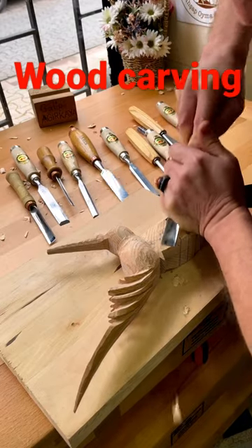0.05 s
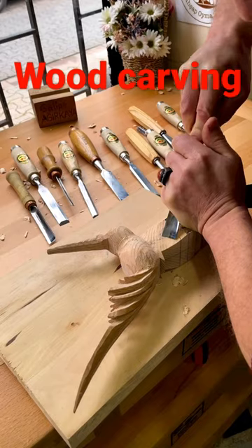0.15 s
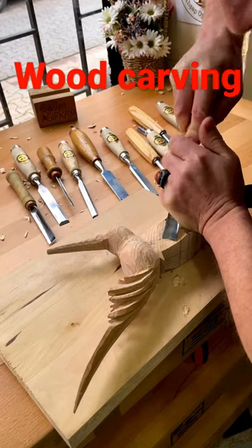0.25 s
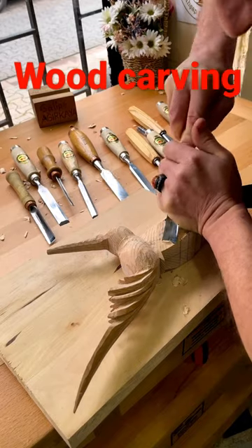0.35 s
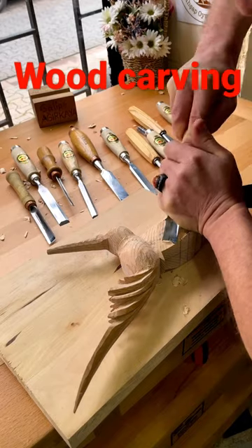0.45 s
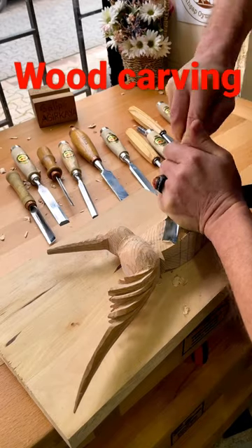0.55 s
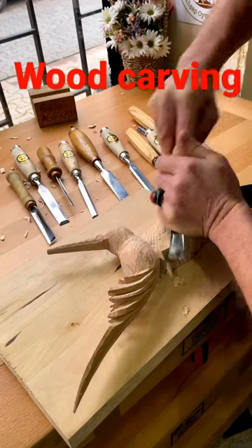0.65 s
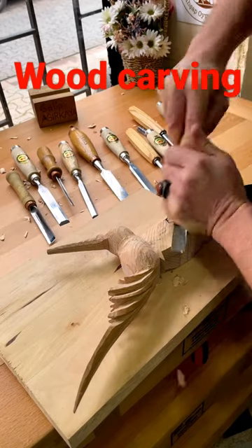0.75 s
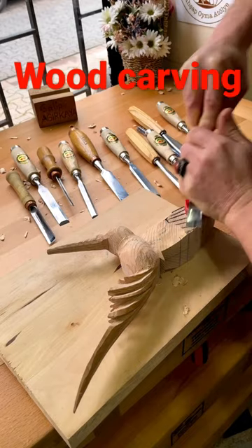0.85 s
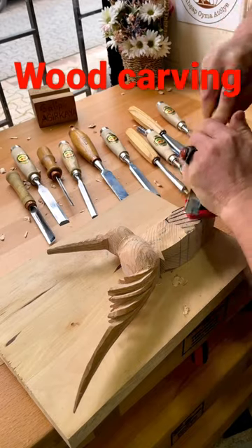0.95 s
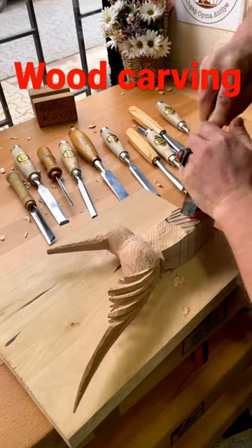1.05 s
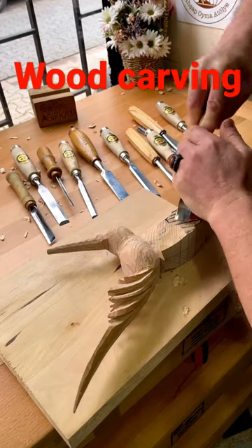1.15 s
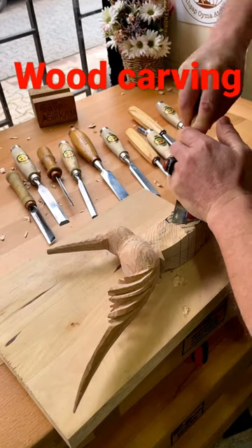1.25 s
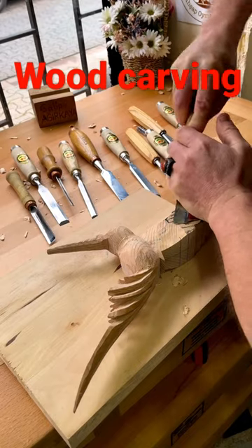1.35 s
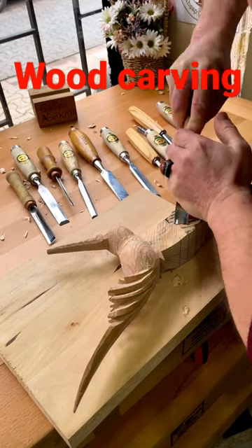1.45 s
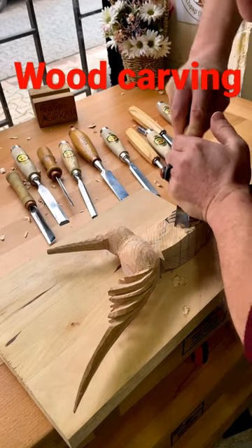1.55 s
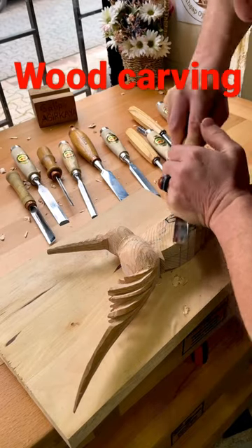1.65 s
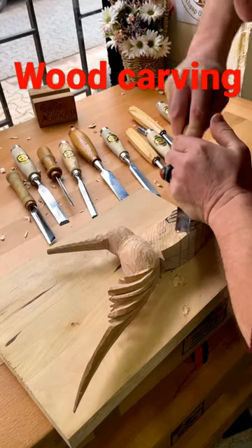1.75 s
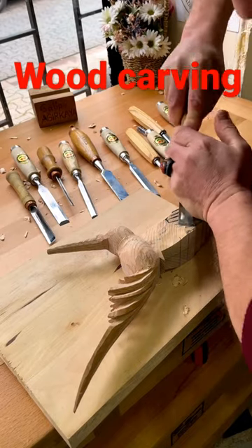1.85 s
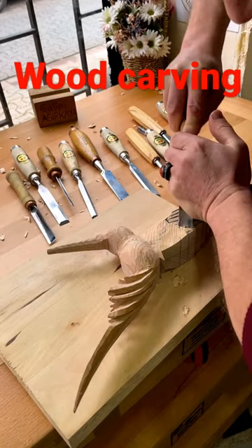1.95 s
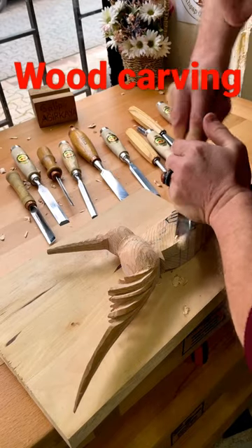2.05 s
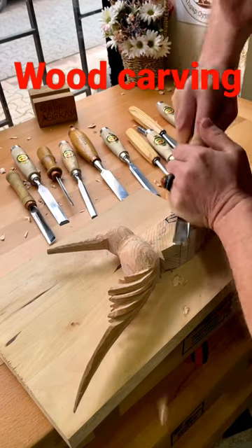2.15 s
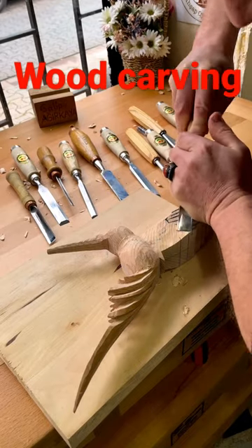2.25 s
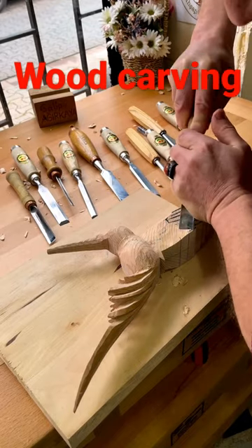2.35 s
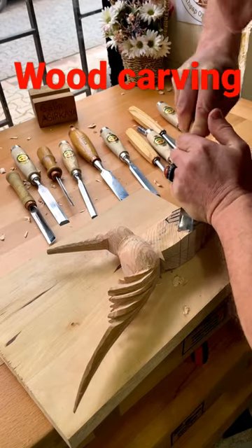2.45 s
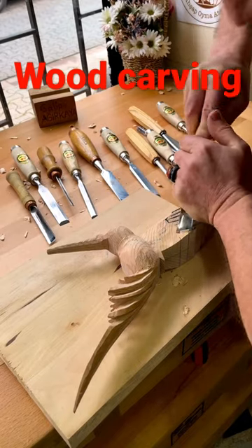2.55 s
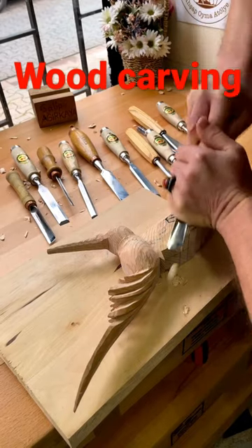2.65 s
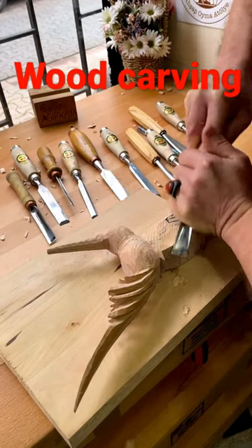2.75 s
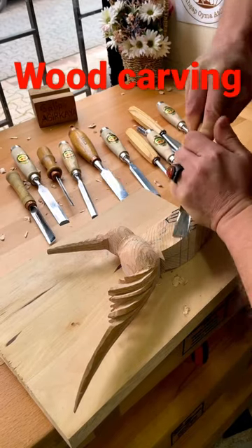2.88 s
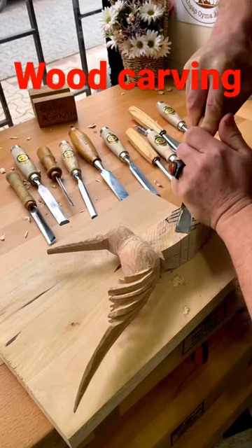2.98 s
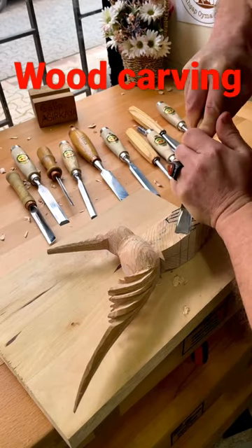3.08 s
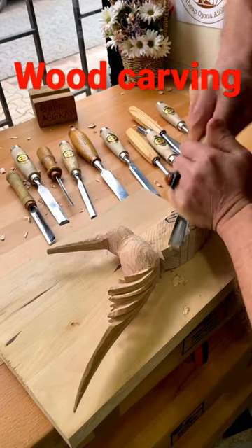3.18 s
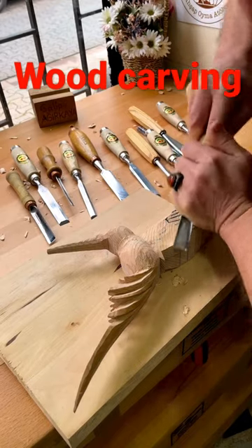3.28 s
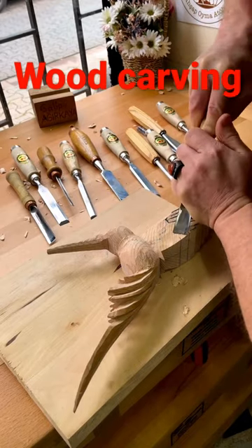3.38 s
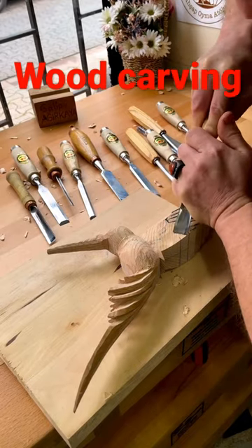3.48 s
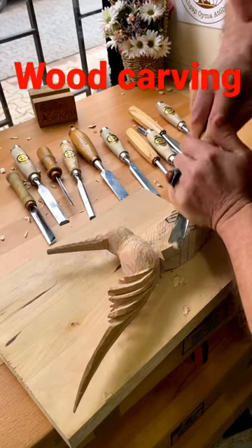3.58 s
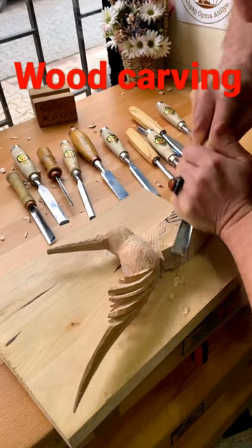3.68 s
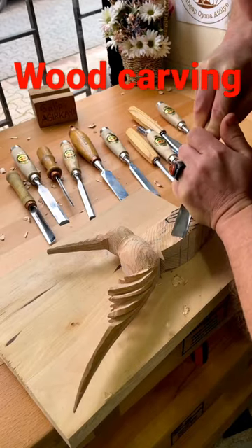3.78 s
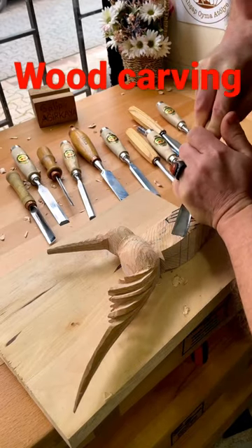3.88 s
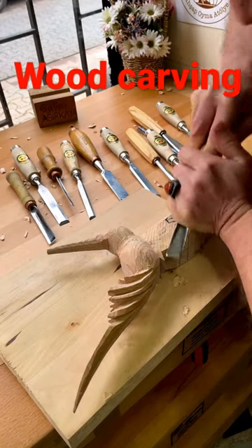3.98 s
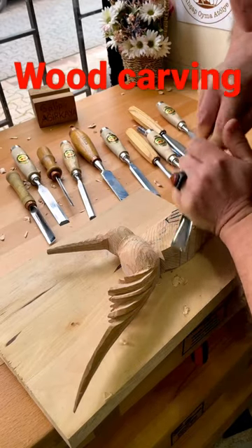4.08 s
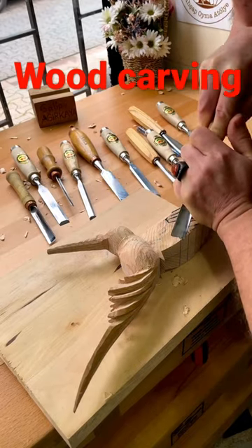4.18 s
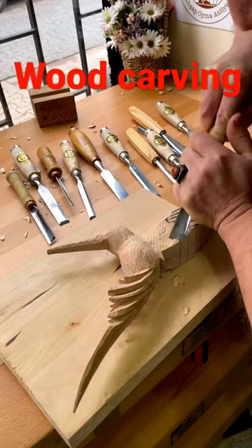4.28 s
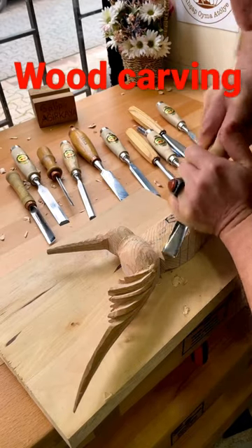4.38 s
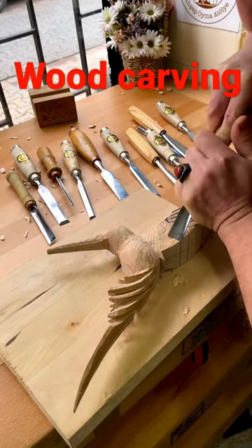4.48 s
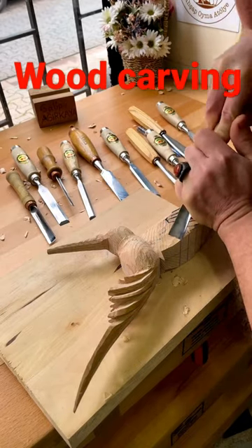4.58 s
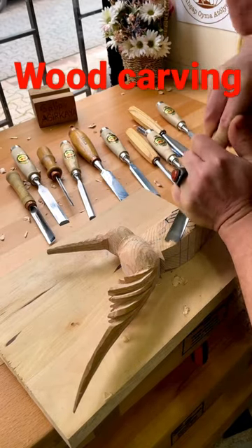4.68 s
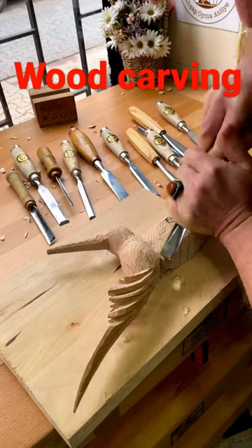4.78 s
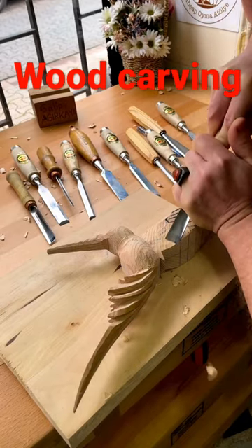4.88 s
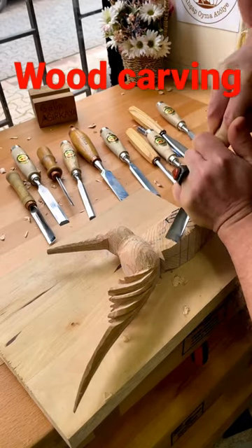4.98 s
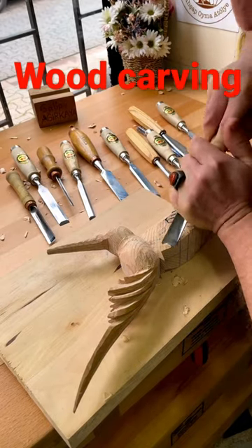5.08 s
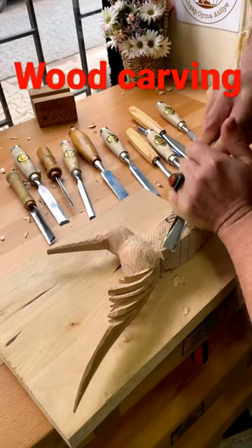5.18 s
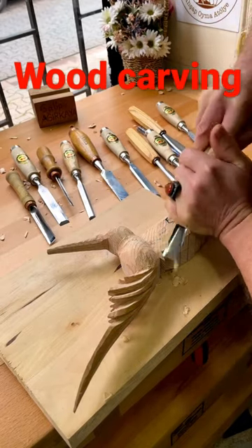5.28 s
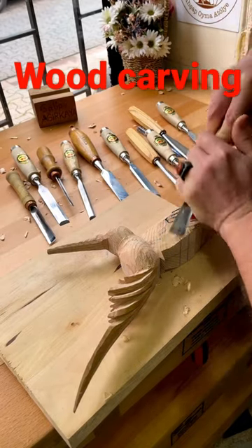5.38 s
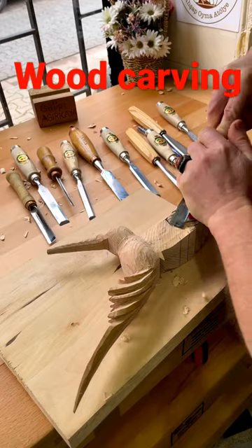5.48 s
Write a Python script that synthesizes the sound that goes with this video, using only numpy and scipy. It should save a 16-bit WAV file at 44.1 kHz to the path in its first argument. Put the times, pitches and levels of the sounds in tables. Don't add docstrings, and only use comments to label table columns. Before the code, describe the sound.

Close, dry wood-carving: separate rasping chisel pushes, the bench creaking underneath, tiny chip ticks, and a quiet low room hum.

```python
import sys
import numpy as np
from scipy import signal
from scipy.fft import rfft, irfft, next_fast_len
from scipy.io import wavfile
from scipy.ndimage import uniform_filter1d

SR = 44100
rng = np.random.default_rng(int(sys.argv[2]) if len(sys.argv) > 2 else 0)


def transcribe(u):
    v = np.clip(np.atleast_2d(u).T, -1, 1)
    q = np.round(v * 32767).astype(np.int16)
    wavfile.write(sys.argv[1], SR, q)


def linear_from_db(decibels):
    return 10 ** (np.asarray(decibels, float) / 20)


N = 243873

# (f/Hz, t60/s, level/dB)
BOARD_MODES = [(556, 0.033, -9), (686.7, 0.18, -3), (755, 0.13, -25), (821, 0.53, -12.5),
               (853.6, 0.14, 0.5), (928, 0.068, 0.5), (1053, 0.068, -12), (1210, 0.095, -2),
               (1470, 0.076, -6), (1560, 0.17, -10), (1647, 0.054, -9.5), (1774, 0.022, -13.5),
               (2012, 0.067, -7.5), (2215, 0.029, -10.5), (2474, 0.011, -8.5), (2930, 0.064, -7.5)]
# (f/Hz, level/dB in each Hz)
RASP_SPECTRUM = [(300, -2.5), (700, 11.5), (1500, -4.5), (2500, -1), (4000, -2.5), (6000, -11.5),
                 (9000, -11.5), (12500, -18), (14000, -45)]
# (t/s of the peak, level/dB, rise/s, fall/s, rasp share/dB)
CUTS = [(0.0, -48, .05, 0.032, -4.5), (0.305, -41.5, 0.094, 0.053, -10.5), (0.634, -31, 0.027, 0.008, -9.5),
        (1.578, -32, 0.059, 0.023, -10), (2.051, -29, 0.059, 0.034, -10), (2.483, -41.5, 0.1, 0.09, -10.5),
        (2.633, -25.5, 0.0036, 0.033, -9), (3.184, -28.5, 0.06, 0.017, -10),
        (3.588, -30.5, 0.06, 0.042, -11), (3.959, -42.5, 0.055, 0.06, -8),
        (4.327, -28.5, 0.055, 0.038, -13.5), (4.702, -30.5, 0.056, 0.071, -10.5),
        (5.069, -39.5, 0.052, 0.017, -8), (5.191, -28.5, 0.014, 0.032, -14.5),
        (5.31, -54.5, 0.13, 0.047, -7)]
# (t/s, level/dB)
NICKS = [(0.176, -62), (0.6, -60), (0.978, -58), (1.086, -79), (1.69, -73), (1.736, -70), (1.809, -48.5),
         (1.885, -52), (1.921, -48), (1.958, -38.5), (2.298, -50.5), (2.39, -52.5), (3.083, -46.5),
         (3.91, -51), (4.104, -54.5), (4.14, -59.5), (4.968, -78), (5.51, -61)]
# (t/s, level/dB)
RUB = [(0, -50), (.22, -69.5), (.45, -72.5), (.7, -59), (.96, -77.5), (1.2, -61.5), (1.5, -58),
       (2.0, -68.5), (2.36, -77), (2.9, -58), (3.049, -71), (3.46, -60.5), (3.88, -79), (4.22, -69),
       (4.62, -91), (4.85, -75), (5.0, -88), (5.53, -74)]


def chisel():
    nick_rise_s, nick_fall_s, nick_rasp_db = 0.0067, 0.016, -15
    nicks = [(s, db, nick_rise_s, nick_fall_s, nick_rasp_db) for s, db in NICKS]

    lag_s, drag_db, follow, drag_fall_s, drag_rasp_db = 0.074, -55.5, 0.67, 0.21, -7
    usual_db = CUTS[2][1]
    drags = [(s + lag_s, drag_db + follow * (db - usual_db), lag_s, drag_fall_s, drag_rasp_db)
             for s, db, *_ in CUTS]
    cut, rasp = efforts(CUTS + nicks + drags, RUB, rest_share_db=-5.5, rounding=1.446)

    tear = snaps(3000, spread_db=1.5) * linear_from_db(1.8 * walk(120))
    unit = np.sqrt(np.mean(ring(tear, BOARD_MODES) ** 2))
    board = ring(tear * cut * linear_from_db(-0.5), BOARD_MODES) / unit

    fibres = colour(snaps(5000, spread_db=3.0) * linear_from_db(1.6 * walk(300)), RASP_SPECTRUM)
    edges_hz = 300 * 2 ** np.arange(0, 5.6, 0.25)
    edge = 0
    for pair in zip(edges_hz, edges_hz[1:]):
        band = signal.sosfilt(signal.butter(2, pair, "band", fs=SR, output="sos"), fibres)
        edge = edge + band * linear_from_db(2.6 * walk(70))
    return board + level(edge, 6.68) * rasp


# (f/Hz, t60/s, level/dB)
BENCH_MODES = [(228.7, 0.21, 2), (258, 0.23, -4.5), (283.7, 0.17, -5.5), (341.1, 0.13, 1), (434, 0.24, -7),
               (479, 0.094, -12), (600.7, 0.049, -7.5), (764, .06, -13.5), (776, 0.053, -15.5),
               (966, 0.079, -19.5)]
# (f/Hz, t60/s, level/dB)
LEG_MODES = [(137.6, 0.043, -5), (168.9, 0.18, -2.5), (182, 0.052, -6.5)]
# (t/s of the peak, level/dB, rise/s, fall/s, share of the leg modes/dB)
SHOVES = [(0.0, -40.5, .05, .2, 8.5), (0.295, -33, 0.038, 0.056, -7.5), (0.36, -50.5, 0.053, .08, 16),
          (0.617, -29, 0.021, 0.11, -3), (0.685, -39, 0.064, 0.079, 4), (0.755, -42, 0.084, 0.099, 4.5),
          (1.576, -28, 0.048, 0.042, -0.5), (1.87, -47.5, .15, 0.28, -26), (2.074, -30, 0.13, 0.074, -4.5),
          (2.496, -30.5, 0.079, 0.04, -2.5), (2.636, -23.5, .008, 0.066, -4.5),
          (2.751, -24, .04, 0.035, -4.5), (2.805, -37, 0.044, .06, 7), (2.945, -29, 0.13, 0.077, -2),
          (3.0, -36.5, 0.059, 0.034, 8), (3.175, -24, 0.059, 0.1, -8.5), (3.59, -29.5, .11, 0.068, -12),
          (4.325, -26, 0.073, 0.1, -20), (4.488, -46.5, 0.08, 0.054, -1), (4.68, -24, 0.03, 0.15, -13.5),
          (4.735, -25, 0.064, 0.073, -8), (5.085, -26.5, 0.069, 0.042, -14), (5.198, -23, 0.024, 0.043, -9),
          (5.296, -45.5, 0.17, 0.075, -1.5)]
# (t/s, level/dB)
LEAN = [(0, -45), (.45, -56), (.57, -51.5), (.83, -51), (1.13, -61), (1.4, -61), (1.7, -51.5), (2.289, -51),
        (2.37, -60.5), (2.87, -45), (3.36, -45.5), (3.7, -48.5), (3.87, -66), (3.98, -52), (4.17, -51),
        (4.24, -70), (4.87, -49.5), (5.53, -68)]


def bench():
    push, deep = efforts(SHOVES, LEAN, rest_share_db=4.5, rounding=1.16)
    groan = 0
    for modes, force in ((BENCH_MODES, push * linear_from_db(-3.5)), (LEG_MODES, deep * linear_from_db(-4.0))):
        lumps = snaps(1500, spread_db=1.2) * linear_from_db(1.5 * walk(40))
        unit = np.sqrt(np.mean(ring(lumps, modes) ** 2))
        groan = groan + ring(lumps * force, modes) / unit
    return groan


# (t/s, peak level/dB, board ring level/dB, brightness level/dB, chip tone f/Hz)
KNOCKS = [(0.178, -64, -30, -21, 740), (0.6, -51.5, -11, -6, 850), (0.6299, -45.5, -13, -3.5, 960),
          (0.9724, -66, -30, -15, 780), (1.1491, -39, -37, -44, 1562), (1.82, -43, -26, -33, 1510),
          (1.8936, -55.5, -11, -30, 1470), (2.2105, -52.5, -22.5, -11, 755), (2.6298, -35, -20, -13.5, 794),
          (2.7424, -45, -35, -20, 860), (2.9474, -65, -12, -32, 813), (3.3453, -54, -24, -6, 1210),
          (3.5736, -43.5, -14, -5, 920), (3.9075, -54, -19.5, -15, 1210), (3.954, -40, -22, -12.5, 1950),
          (4.2464, -65, -31, -26, 759), (4.6732, -55, -26, -28.5, 1210), (4.9654, -67, -25, -24, 805),
          (5.183, -31, -16.5, -4, 1210), (5.3083, -47.5, -33, -36, 940), (5.4113, -64, -30, -5, 912),
          (5.4898, -44, -22.5, -34, 810)]
# (f/Hz, level/dB)
CRACK_SPECTRUM = [(400, -9), (900, 4), (1550, -17.5), (2500, 3), (4000, 5), (6000, -9.5), (9000, -40),
                  (13000, -8)]


def knocks():
    t = np.arange(int(0.04 * SR)) / SR
    crack, top, tone, board, thud = np.zeros((5, N + len(t)))
    bursts = rng.standard_normal((len(KNOCKS), len(t))) * np.exp(-t / 0.0026)
    for (s, db, ring_db, bright_db, hz), burst in zip(KNOCKS, bursts):
        at = slice(int(s * SR), int(s * SR) + len(t))
        crack[at] += linear_from_db(db) * burst
        top[at] += linear_from_db(db + bright_db) * burst * np.exp(-t / 0.0012)
        tone[at] += linear_from_db(db - 2) * np.sin(2 * np.pi * hz * t) * np.exp(-t / 0.005)
        board[at] += linear_from_db(db + ring_db) * burst
        thud[at] += linear_from_db(db - 16.5 + 0.41 * bright_db) * np.exp(-t / 0.0004)
    ticks = linear_from_db(5) * colour(crack, CRACK_SPECTRUM) + tone[:N]

    sizzle = signal.sosfilt(signal.butter(2, 6500, "high", fs=SR, output="sos"), top[:N])
    body = linear_from_db(18.5) * sizzle
    body = body + linear_from_db(30.0) * ring(board[:N], BOARD_MODES)
    body = body + linear_from_db(23.5) * ring(thud[:N], BENCH_MODES + LEG_MODES)
    return ticks, body


# (t/s, level/dB)
SLIDE = [
    (1.16, -73),
    (1.18, -60.5),
    (1.312, -70),
    (1.352, -66),
    (1.524, -60),
    (1.56, -64),
]


def slide():
    s, db = np.transpose(SLIDE)
    band = signal.butter(3, (3200, 5400), "band", fs=SR, output="sos")
    hiss = signal.sosfilt(band, rng.standard_normal(N))
    return level(hiss, 0) * linear_from_db(np.interp(np.arange(N) / SR, s, db, left=-120, right=-120))


# (f/Hz, level/dB)
AIR_SPECTRUM = [(15, -33.5), (25, -6), (70, -4.5), (351, -11), (644, -16), (796, -10), (1040, -37),
                (2120, -33), (2480, -58.5), (4200, -31), (5770, -44.5), (12400, -44), (13800, -75)]
# (f/Hz, width/Hz, level/dB)
HUM = [(58.1, 4.6, -53), (100.16, 3.4, -58)]
# (f/Hz, start t/s, end t/s, level/dB)
WHINE = [
    (3135, 2.2, 3.6, -73),
    (4710, 2.4, 2.9, -68),
    (4750, 5.4, 4.8, -83),
]


def shop():
    t = np.arange(N) / SR
    air = level(colour(rng.standard_normal(N), AIR_SPECTRUM), -55) * linear_from_db(0.94 * walk(5.21))
    for hz, width, db in HUM:
        b, a = signal.iirpeak(hz, hz / width, fs=SR)
        air = air + level(signal.lfilter(b, a, rng.standard_normal(N)), db) * linear_from_db(0.5 * walk(1.5))
    for hz, start, end, db in WHINE:
        b, a = signal.iirpeak(hz, 60, fs=SR)
        whine = level(signal.lfilter(b, a, rng.standard_normal(N)), db)
        gate = uniform_filter1d(1. * (t > start) * (t < end), size=3000)
        air = air + whine * gate * linear_from_db(3.3 * walk(45))
    return air


# (f/Hz, phase/rad)
PORT_LEAD = [(0, 0), (250, 0), (550, -2.3), (800, -2.4), (1500, -.1), (2100, .5), (2650, 3), (3600, 6.6),
             (4800, 6.8), (5500, 9.4), (6300, 9.5), (7200, 12.4), (8500, 12.6), (9700, 15.7), (10800, 15.8),
             (12000, 18.8), (14000, 19)]
# (f/Hz, level/dB)
PORT_SHADE = [(60, 0), (110, 2.5), (200, 5), (340, 11), (480, 6), (1200, 4.5), (2200, .5), (4000, -2.5),
              (5300, 0), (13400, -1)]
# (f/Hz, level/dB)
SCATTER = [(60, -14.5), (250, -12.5), (600, -1), (1500, -2.5), (2500, -5.5), (3000, 6.5), (4800, 4.5),
           (5500, -5), (6300, -1.5), (7000, -2.5), (8200, 0.5), (11200, -4), (12300, -14)]


def ports(x):
    room_t60_s, onset_s = 0.2, 0.00078
    size = 2 * next_fast_len(N // 2 + SR // 4)
    hz = np.arange(size // 2 + 1) * SR / size
    turn = np.exp(0.5j * np.interp(hz, *np.transpose(PORT_LEAD)))
    shade = linear_from_db(across(PORT_SHADE, hz) / 2)

    t = np.arange(int(0.4 * SR)) / SR
    decay = np.exp(-np.log(1000) * t / room_t60_s) * np.minimum(t / onset_s, 1)
    tails = rng.standard_normal((2, len(t))) * decay
    tails = tails / np.sqrt(np.sum(tails ** 2, axis=1, keepdims=True))
    tails = rfft(tails, size) * linear_from_db(across(SCATTER, hz))

    paths = np.array([turn + tails[0], 1 / turn + tails[1]])
    paths = paths / np.sqrt(uniform_filter1d(np.abs(paths) ** 2, size=500, axis=1))
    return irfft(rfft(x, size) * paths * np.array([shade, 1 / shade]), size)[:, :N]


def efforts(rows, rest, rest_share_db, rounding):
    t = np.arange(0, N + 16, 16) / SR
    whole = linear_from_db(np.interp(t, *np.transpose(rest))) ** 2
    share = whole * linear_from_db(rest_share_db) ** 2
    for s, db, rise, fall, share_db in rows:
        away = np.abs(t - s) / np.where(t < s, rise, fall)
        swell = linear_from_db(db - 20 * np.minimum(away, 10) ** rounding) ** 2
        whole = whole + swell
        share = share + swell * linear_from_db(share_db) ** 2
    return [np.interp(np.arange(N) / SR, t, np.sqrt(power)) for power in (whole, share)]


def snaps(rate, spread_db):
    when, size, sign = rng.random(N), rng.exponential(size=N), rng.standard_normal(N)
    return level((when < rate / SR) * sign * linear_from_db(spread_db * size), 0)


def ring(x, modes):
    out = 0
    for k, (hz, t60, db) in enumerate(modes):
        r = np.exp(-np.log(1000) / (t60 * SR))
        w = 2 * np.pi * hz / SR
        mode = signal.lfilter([0, np.sin(w)], [1, -2 * r * np.cos(w), r * r], x)
        out = out + (-1) ** k * linear_from_db(db) * np.sqrt(1 - r) * mode
    return out


def colour(x, points):
    hz, db = np.transpose(points)
    grid_hz = np.arange(2049) * SR / 4096
    cep = irfft(np.interp(np.log(grid_hz + 1), np.log(hz), db) * np.log(10) / 20)
    cep[1:2048] *= 2
    cep[2049:] = 0
    return signal.fftconvolve(x, irfft(np.exp(rfft(cep))))[:N]


def walk(rate):
    k = int(SR / rate)
    held = np.repeat(rng.standard_normal(size=4096)[:N // k + 1], k)
    return 1.06 * uniform_filter1d(uniform_filter1d(held, k), k)[:N]


def level(x, db):
    return x * linear_from_db(db) / np.sqrt(np.mean(x ** 2))


def across(points, hz):
    return np.interp(np.log(hz + 1), np.log(np.array(points)[:, 0]), np.array(points)[:, 1])


def scene():
    ticks, body = knocks()
    blade = chisel()
    null_band = signal.butter(2, (2450, 3200), "band", fs=SR, output="sos")
    ticks = ticks + linear_from_db(-9) * signal.sosfilt(null_band, blade)
    work = ports(blade + bench() + body + linear_from_db(-0.5) * ticks + shop() + slide())
    return work + np.array([linear_from_db(-2.5) * ticks, linear_from_db(2.5) * ticks])


def top_cut(x):
    return signal.sosfilt(signal.butter(12, 13950, fs=SR, output="sos"), x)


def record(dry):
    band = signal.sosfilt(signal.butter(3, 40, "high", fs=SR, output="sos"), dry)
    band = signal.sosfilt(signal.ellip(8, 0.3, 45, 13250, fs=SR, output="sos"), band)
    return top_cut(band)


dry = scene()
out = record(dry)
transcribe(out)
```